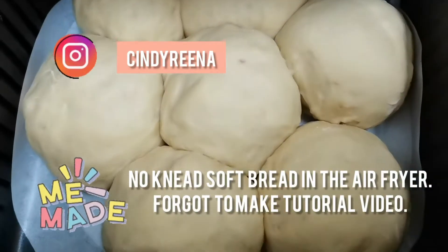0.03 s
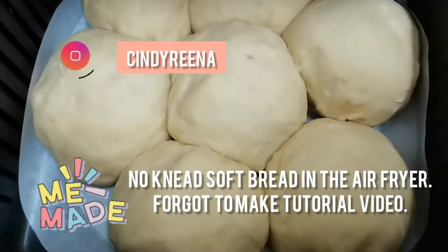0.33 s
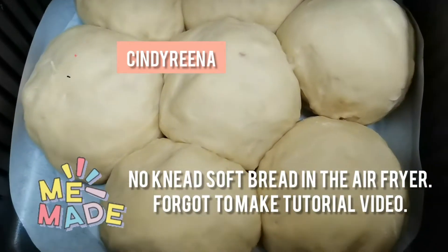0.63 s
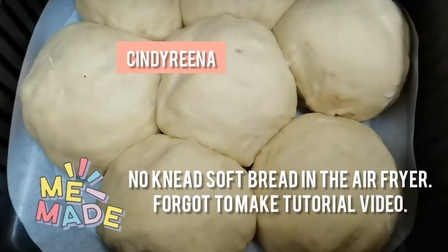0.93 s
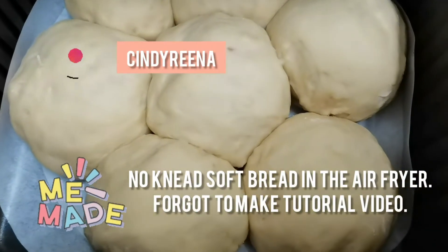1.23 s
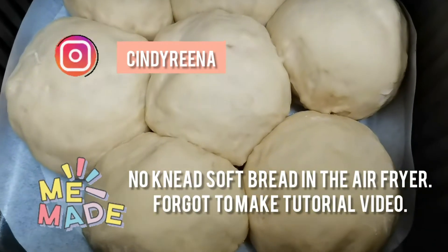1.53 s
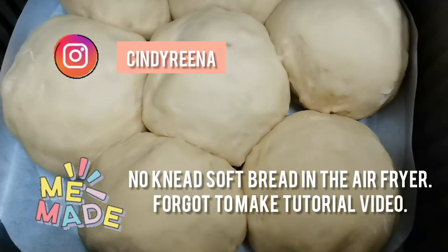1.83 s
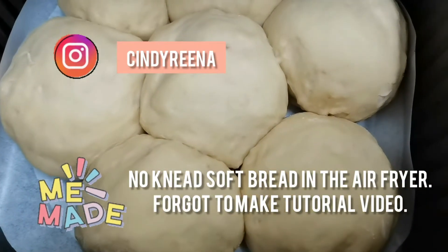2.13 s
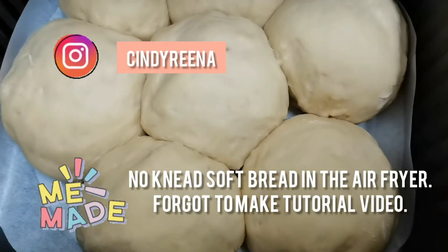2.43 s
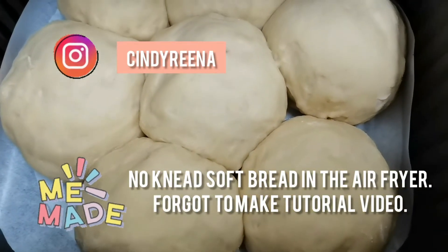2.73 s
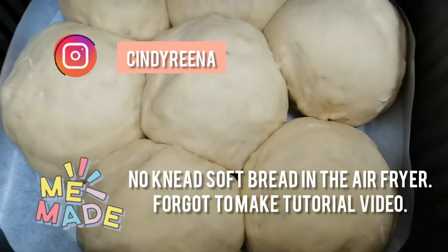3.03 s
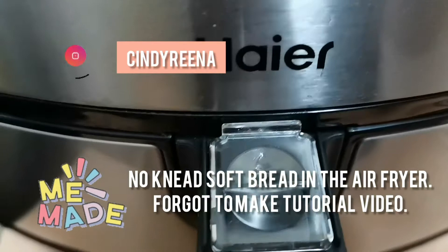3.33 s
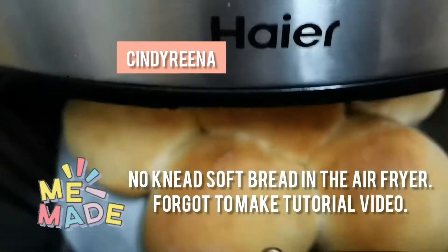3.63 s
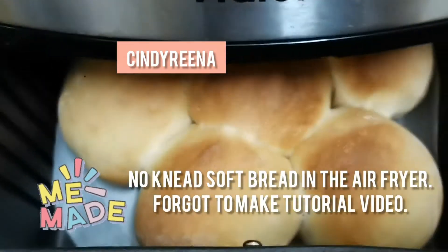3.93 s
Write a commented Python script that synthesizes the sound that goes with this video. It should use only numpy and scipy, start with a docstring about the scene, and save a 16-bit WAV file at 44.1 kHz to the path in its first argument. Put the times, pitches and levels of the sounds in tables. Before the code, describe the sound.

An air fryer drawer snaps and knocks open, following close handling clicks in a quiet kitchen.

```python
"""Opening an air fryer drawer

In a quiet kitchen, fingers tap and scuff a hand-held camera right at its right microphone port.
After a short dropout to silence, an air fryer drawer is tugged: it knocks in its housing, the catch
snaps free, the metal basket rings, and the drawer slides out with a faint rumble."""
import sys
import numpy as np
from scipy import signal
from scipy.fft import rfft, irfft
from scipy.io import wavfile

SR = 44100
rng = np.random.default_rng(int(sys.argv[2]) if len(sys.argv) > 2 else 0)


def output_pcm(signal):
    """Save a mono or channel-first signal as 16-bit PCM at the path in sys.argv[1].

    Samples are clipped to [-1, 1] before scaling.
    """
    pcm = np.clip(np.atleast_2d(signal).T, -1, 1) * 32767
    wavfile.write(sys.argv[1], SR, np.round(pcm).astype(np.int16))


N = 176400
TIME = np.arange(N) / SR


def amp(db):
    """Decibels to gain."""
    return 10 ** (np.asarray(db) / 20)


def unit(x):
    """Scales to rms 1."""
    return x / np.sqrt(np.mean(x ** 2) + 1e-20)


def decay(t, t60):
    """An envelope that falls 60 dB in t60 seconds."""
    return np.exp(-np.log(1000) * t / t60)


def read(curve, hz):
    """Reads a curve on a log-frequency axis."""
    freqs, values = np.transpose(curve)
    return np.interp(np.log(hz + 1), np.log(freqs + 1), values)


def add(mix, start, sound):
    """Mixes a sound in at a start time in seconds."""
    part = mix[..., max(round(start * SR), 0):][..., :sound.shape[-1]]
    part += sound[..., :part.shape[-1]]


def colour(x, curve, keep_power=False, size=4096):
    """Minimum-phase EQ; with keep_power only the curve's shape counts."""
    log_gain = np.log(amp(read(curve, abs(np.fft.fftfreq(size, 1 / SR)))))
    response = np.exp(np.conj(signal.hilbert(log_gain)))
    kernel = np.fft.ifft(response).real[:size // 2]
    if keep_power:
        kernel = kernel / np.linalg.norm(kernel)
    return signal.oaconvolve(x, kernel if x.ndim == 1 else kernel[None], axes=-1)[..., :N]


def pair(x, likeness):
    """Makes two unrelated channels partly alike, band by band."""
    left, right = rfft(x)
    shared = np.clip(read(likeness, np.fft.rfftfreq(N, 1 / SR)), -1, 1)
    return irfft([left, shared * left + np.sqrt(1 - shared ** 2) * right], N)


def soften(x, hz):
    """Two gentle one-pole low-passes in a row."""
    pole = np.exp(-2 * np.pi * hz / SR)
    return signal.lfilter([(1 - pole) ** 2], [1, -2 * pole, pole ** 2], x)


def wander(shape, hz):
    """Smooth random motion at rms 1, mostly slower than hz."""
    return unit(soften(rng.standard_normal(shape), hz))


def ring(modes, t, ratio=1):
    """Dying modes after one blow."""
    return sum(amp(db) * decay(t, t60) * np.sin(2 * np.pi * hz * ratio * t) for hz, db, t60 in modes)


def burst(t60, room_db, room_t60, rise_s):
    """Clumpy contact noise that dies fast, then the room's slower answer."""
    t = TIME[:SR // 2]
    clumps = unit(amp(2.5 * wander(len(t), hz=250)))
    level = np.hypot(clumps * decay(t, t60), amp(room_db) * decay(t, room_t60))
    attack = 1 - np.exp(-t / rise_s)
    return level * attack * rng.standard_normal((2, len(t)))


# Tone of the room bed. Each row: frequency in Hz, relative level in dB.
ROOM_EQ = [(15, -35.5), (25, -8), (99, -2.5), (129, -12), (164, -6), (246, -16), (495, -22), (537, -24),
           (598, -25.5), (1710, -34), (2630, -34), (3170, -36.5), (9050, -44), (13200, -35), (15500, -41)]
# Its lean to one side. Each row: frequency in Hz, left over right in dB.
ROOM_BALANCE = [(60, 9.5), (240, 2.5), (950, 0.5), (3770, -2.5), (15000, 0.5)]
# Its stereo width. Each row: frequency in Hz, left-right likeness from 0 to 1.
ROOM_LIKENESS = [(60, 0.56), (240, 0.35), (950, 0), (3770, 0.11), (15000, 0.059)]


def room_tone():
    """A wide bed of low kitchen rumble and microphone hiss."""
    noise = pair(rng.standard_normal((2, N)), ROOM_LIKENESS)
    bed = amp(-62) * colour(noise, ROOM_EQ, keep_power=True)
    lean_db = read(ROOM_BALANCE, np.fft.rfftfreq(N, 1 / SR)) / 2
    return irfft(rfft(bed) * amp([lean_db, -lean_db]), N)


# Faint, far whistles. Each row: start in seconds, length in seconds, pitch in Hz, level in dB.
WHISTLES = [(0, 0.18, 1870, -69.5), (0.088, 0.13, 2620, -79), (.46, 0.18, 2220, -78),
            (1.53, 0.063, 2660, -78)]


def whistles(width_hz=200):
    """Breathy, narrow bands of noise that swell quickly and fade."""
    out, t = np.zeros((2, N)), TIME[:SR]
    for start, length, hz, db in WHISTLES:
        swell = np.sin(np.pi * np.sqrt(np.minimum(t / length, 1)))
        waver = wander((2, SR), width_hz / 2)
        add(out, start, amp(db) * swell * waver * np.sin(2 * np.pi * hz * t))
    return out


# Skin scuffs. Each row: start in seconds, length in seconds, level in dB, slip cut-off in Hz.
SCUFFS = [(0.446, 0.019, -29, 3000), (0.697, 0.0087, -28.5, 1980), (0.702, 0.022, -18.5, 3500),
          (0.714, 0.02, -30, 2150), (0.794, 0.025, -30, 1840), (0.955, 0.025, -38.5, 1770),
          (1.007, 0.013, -36.5, 1470), (1.048, 0.027, -40.5, 1590), (1.068, 0.088, -52.5, 1200),
          (1.152, 0.033, -46.5, 2180), (1.226, 0.028, -41.5, 1920), (1.257, 0.014, -24.5, 2570),
          (2.892, 0.092, -48, 1700), (2.936, 0.088, -56, 1200)]


def finger_scuffs(slips_per_s=4900, rub_db=-4.5):
    """Skin drags over the casing in a run of tiny slips, with a dull rub underneath."""
    out, t = np.zeros(N), TIME[:SR // 10]
    for start, length, db, cutoff_hz in SCUFFS:
        slips = rng.choice([-1, 1], len(t)) * (rng.random(len(t)) < slips_per_s / SR)
        grit = unit(soften(slips, cutoff_hz))
        rub = amp(rub_db) * wander(len(t), hz=250)
        stroke = np.sin(np.pi * np.minimum(t / length, 1) ** 0.64) ** 2  # peaks early
        add(out, start, amp(db) * stroke * unit(grit + rub))
    return out


# Taps on the camera. Each row: start in seconds, level in dB, cut-off in Hz,
# casing ring against the tick in dB, pitch ratio of the ring.
TAPS = [(0.4553, -10.5, 5470, -1.5, 0.96), (0.7055, -18, 2980, -3.5, .85), (0.7983, -13.5, 3000, 0, 0.88),
        (.961, -22.5, 1500, -11.5, 0.776), (1.0103, -24, 1310, -5.5, 0.88), (1.0565, -26, 1710, -7, 0.873),
        (1.163, -34, 2000, 1.5, 0.914), (1.2616, -13.5, 4500, -40, 1), (1.2635, -7.5, 2700, -16.5, 0.56),
        (1.2708, -17, 2970, -7, 0.97), (2.9, -42.5, 2500, -21, 1), (2.935, -31, 2530, -21, 0.9),
        (2.938, -27.5, 1970, -28, 0.45)]
# Ring of the casing. Each row: frequency in Hz, relative level in dB, 60 dB decay time in seconds.
CASING_MODES = [(465, -10.5, 0.016), (821, -4.5, 0.014), (1200, -1.5, 0.012), (1882, 2, 0.0089),
                (2330, -15.5, 0.011), (2930, -6.5, .017), (3910, -8, .016), (4510, -13, .012),
                (6800, -14.5, .012)]


def finger_taps():
    """Each tap is a tick, rounded by the give of skin, and a short ring of the casing."""
    out, t = np.zeros(N), TIME[:SR // 10]
    for start, db, cutoff_hz, ring_db, ratio in TAPS:
        tick = soften(signal.unit_impulse(len(t)), cutoff_hz)
        casing = soften(ring(CASING_MODES, t, ratio), 2 * cutoff_hz)
        add(out, start, amp(db) * (tick / tick.max() - amp(ring_db) * casing))
    return out


# Soft fingertip presses. Each row: start in seconds, level in dB, pulse width in seconds.
PRESSES = [(0.705, -26, 0.0023), (.722, -24.5, .0018), (.804, -26, 0.0023), (.829, -46, 0.00086),
           (0.9546, -19, 0.00049), (0.9605, -20.5, 0.0017), (1.0095, -16, 0.00062), (1.058, -20, 0.0015),
           (1.2709, -8.5, 0.0013), (2.9262, -20.5, 0.0017), (2.9597, -24.5, 0.0021)]


def finger_presses():
    """A fingertip pushes on the casing: one low, heavily damped bump."""
    out = np.zeros(N)
    for start, db, width in PRESSES:
        phase = TIME[:SR // 10] / width
        add(out, start, -2 * amp(db) * np.sin(phase) * np.exp(-0.7 * phase))
    return out


# Tone of the path through the casing. Each row: frequency in Hz, gain in dB.
CASING_EQ = [(30, -29), (90, -6), (250, 2), (1000, 3), (2000, 0), (4000, -1), (5200, -11), (6500, -10.5),
             (8500, -33.5), (12000, -17), (16000, -34)]


def through_casing(handling, room_db=-35.5):
    """The casing carries touches to the right port, with a little room; the left gets a dull trace."""
    close = colour(handling, CASING_EQ)
    tail = decay(TIME[:SR // 4], t60=0.2) * rng.standard_normal(SR // 4)
    reverb = amp(room_db) * signal.oaconvolve(close, tail / np.linalg.norm(tail))[:N]
    return np.array([amp(-39.5) * soften(close, hz=900), close + reverb])


# Stereo width of rumble, clacks and cracks. Each row: frequency in Hz, left-right likeness from 0 to 1.
FRYER_LIKENESS = [(60, .85), (250, 0.71), (700, 0.25), (2000, .6), (6000, .5), (15000, .3)]
# Fader ride of the rumble. Each row: time in seconds, level in dB.
RUMBLE_RIDE = [(3.26, -78), (3.3, -45), (3.46, -44), (3.6, -48.5), (3.75, -63.5), (3.85, -58.5),
               (3.92, -57), (4, -67.5)]
# Tone of the rumble and of the swish. Each row: frequency in Hz, relative level in dB.
RUMBLE_EQ = [(25, -9.5), (75, 7.5), (115, -7.5), (190, -1), (400, -17), (1000, -24), (2500, -37.5),
             (6000, -42), (15000, -47.5)]
SWISH_EQ = [(100, -4), (1000, 7), (2200, -5.5), (3500, -6), (7500, -6.5), (9000, -12), (10200, -2.5),
            (15000, -18)]
# Thin ring of the moving basket and hum of the runners.
# Each row: start in seconds, pitch in Hz, width of the pitch waver in Hz, level in dB.
SLIDE_TONES = [(3.79, 5486, 22, -85), (3.865, 608, 14.5, -69)]


def drawer_slide(free_s=3.82, swish_rise_s=0.086, swish_db=-67, tone_rise_s=0.011):
    """The drawer rumbles on its runners, then swishes and hums once it moves freely."""
    low, high = rng.standard_normal((2, 2, N))
    times, levels_db = np.transpose(RUMBLE_RIDE)
    ride = amp(np.interp(TIME, times, levels_db)) * (TIME > times[0])
    rumble = ride * colour(pair(low, FRYER_LIKENESS), RUMBLE_EQ, keep_power=True)
    swish = colour(high, SWISH_EQ, keep_power=True) * np.clip((TIME - free_s) / swish_rise_s, 0, 1)
    grain = unit(amp(2.5 * wander(N, hz=69.6)))
    out = rumble + amp(swish_db) * grain * swish
    attack = np.minimum(TIME[:SR] / tone_rise_s, 1)
    for start, hz, width_hz, db in SLIDE_TONES:
        pitch = hz + width_hz / 2 * wander(SR, hz=30)
        tone = unit(np.sin(2 * np.pi * np.cumsum(pitch) / SR))
        add(out, start, amp(db) * attack * tone)
    return out


# The drawer knocks in its housing. Each row: start in seconds, thump level in dB, clack level in dB.
KNOCKS = [(3.275, -35, -46.5), (3.306, -56, -46.5), (3.321, -36, -49), (3.366, -30, -38.5),
          (3.384, -24, -30), (3.409, -20.5, -20), (3.428, -25, -23), (3.445, -21.5, -22), (3.469, -27, -23),
          (3.510, -28, -25), (3.527, -30, -36), (3.567, -40, -51), (3.634, -42.5, -48.5), (3.659, -48, -68),
          (3.703, -56.5, -50), (3.721, -49, -61), (3.77, -51.5, -65.5), (3.822, -56, -71),
          (3.869, -54, -49), (3.904, -53.5, -67.5)]
# Its hollow body. Each row: frequency in Hz, relative level in dB, 60 dB decay time in seconds.
DRAWER_MODES = [(76, -20, 0.22), (165, -3.5, .2), (211, -1.5, .12), (228.5, -1, 0.14), (332.8, -9.5, 0.14),
                (349.4, -13, 0.17), (514, -21, .12), (944, -29.5, .1)]
# Tone of the plastic clack. Each row: frequency in Hz, relative level in dB.
CLACK_EQ = [(40, -6.5), (120, -5), (300, 0.5), (650, 0), (1200, -6.5), (2400, -14.5), (4500, -19.5),
            (8000, -32), (15000, -42)]


def drawer_knocks(thump_rise_s=0.002, hard_db=-24.5, db_per_octave=13.5):
    """Each knock thumps the hollow drawer and clacks plastic on plastic, brighter when harder."""
    thumps, clacks, t = np.zeros(N), np.zeros((2, N)), TIME[:SR]
    body = ring(DRAWER_MODES, t) * (1 - np.exp(-t / thump_rise_s))
    for start, thump_db, clack_db in KNOCKS:
        add(thumps, start, amp(thump_db) * body)
        cutoff_hz = 7000 * 2 ** ((clack_db - hard_db) / db_per_octave)
        clack = burst(t60=0.077, room_db=-11, room_t60=0.26, rise_s=0.003)
        add(clacks, start, amp(clack_db) * soften(clack, cutoff_hz))
    return thumps + colour(pair(clacks, FRYER_LIKENESS), CLACK_EQ, keep_power=True)


# The catch lets go and rebounds. Each row: start in seconds, level in dB.
SNAPS = [(3.3922, -31), (3.3989, -13.5), (3.4019, -12.5), (3.4116, -24.5), (3.4439, -27.5)]
# Bright tone of the snap. Each row: frequency in Hz, relative level in dB.
SNAP_EQ = [(60, -25), (300, -13.5), (900, -12.5), (1300, -3), (2300, 0), (2900, -6), (4100, 0.5),
           (5200, -9.5), (6600, -3.5), (9000, -12.5), (11000, -10), (15000, -25.5)]
# The metal basket. Each row: frequency in Hz, relative level in dB, 60 dB decay time in seconds.
BASKET_MODES = [(828, -7, .33), (1472, 0, .065), (1515, 1, .07), (1789, -10, .12), (2125, -11, .2),
                (2281, -7, .1), (2510, -14, .23), (3965, -16, .3), (4212, -10, .27), (4323, -19, .36),
                (6141, -15, .23), (6966, -10, .13), (7785, -11, .22), (8005, -17, .22)]


def catch_snap(basket_db=-21, dip_db=-1.5, dip_s=0.0068):
    """The spring catch cracks free and sets the metal basket ringing."""
    cracks, basket = np.zeros((2, N)), np.zeros(N)
    for start, db in SNAPS:
        add(cracks, start, amp(db) * burst(t60=0.051, room_db=-10.5, room_t60=0.27, rise_s=0.0002))
    release_s = SNAPS[1][0]  # the first loud crack
    add(basket, release_s, amp(basket_db) * ring(BASKET_MODES, TIME[:SR]))
    left, right = basket + colour(pair(cracks, FRYER_LIKENESS), SNAP_EQ, keep_power=True)
    dip = amp(dip_db * np.exp(-abs(TIME - release_s) / dip_s))
    return np.array([left, right * dip])


# Muffling of the fryer at the half-covered right port. Each row: frequency in Hz, gain in dB.
COVERED_PORT_EQ = [(60, -11), (180, -7), (380, -0.5), (800, -5), (2200, -5), (2900, -13.5), (4200, -13),
                   (5000, -18), (6500, -28), (8500, -39), (15000, -41)]


def scene():
    """Room bed, fingers close on the right, and the fryer clear on the left but muffled on the right."""
    bed = room_tone() + whistles()
    fingers = through_casing(finger_scuffs() + finger_taps() + finger_presses())
    left, right = drawer_slide() + drawer_knocks() + catch_snap()
    return bed + fingers + np.array([left, colour(right, COVERED_PORT_EQ)])


def record(dry):
    """The mix fades briefly to silence before the tug, and the very top is rolled off."""
    mute_s, fade_out_s, reopen_s, fade_in_s = 3.055, 0.035, 3.167, 0.059
    fade_out = np.clip((mute_s - TIME) / fade_out_s, 0, 1)
    fade_in = np.clip((TIME - reopen_s) / fade_in_s, 0, 1)
    low_pass = signal.firwin(511, cutoff=15500, window=("kaiser", 9), fs=SR)
    return signal.oaconvolve(dry * (fade_out + fade_in), low_pass[None], "same")


dry = scene()
out = record(dry)
output_pcm(out)
```